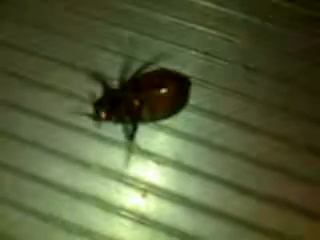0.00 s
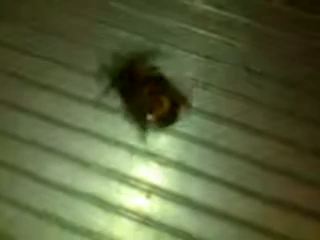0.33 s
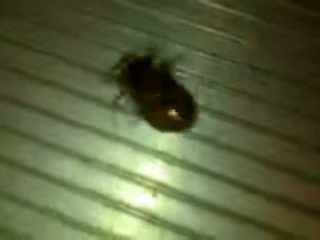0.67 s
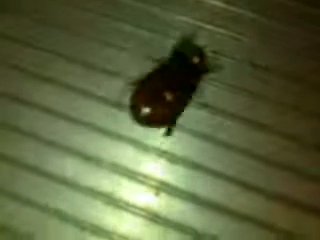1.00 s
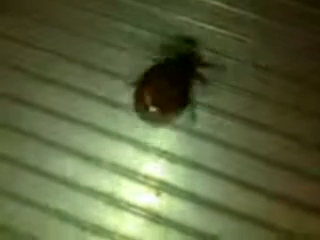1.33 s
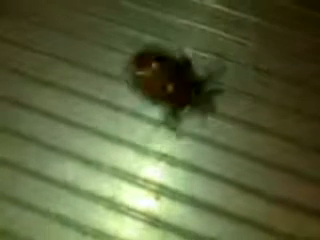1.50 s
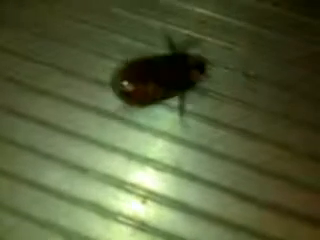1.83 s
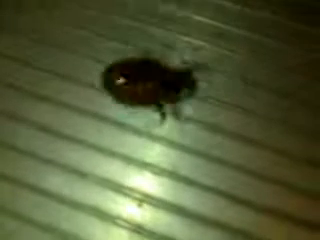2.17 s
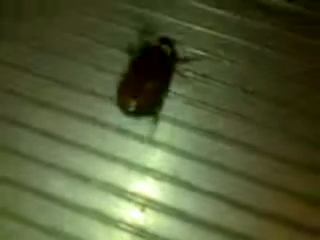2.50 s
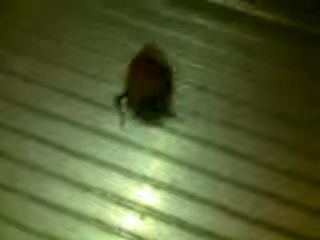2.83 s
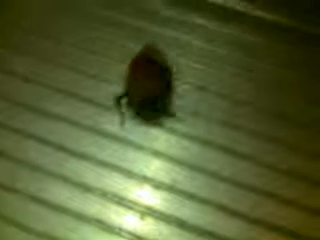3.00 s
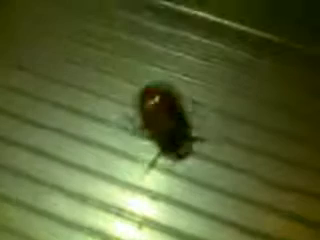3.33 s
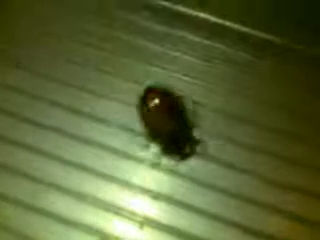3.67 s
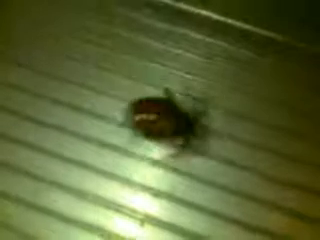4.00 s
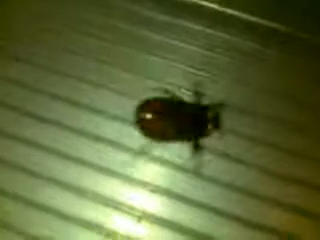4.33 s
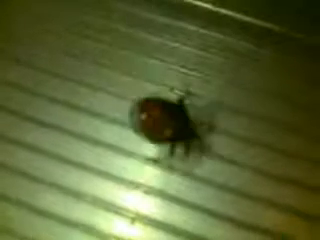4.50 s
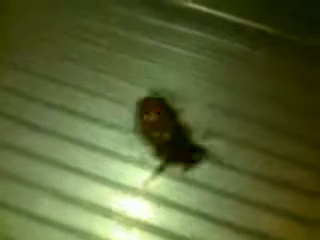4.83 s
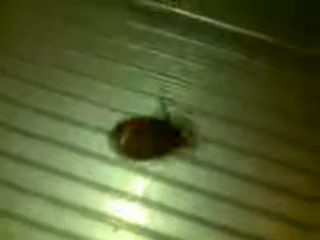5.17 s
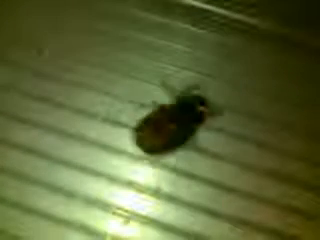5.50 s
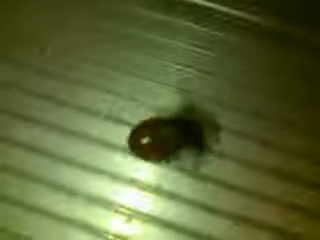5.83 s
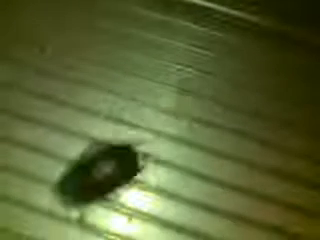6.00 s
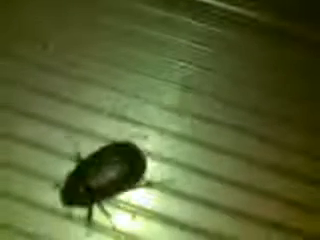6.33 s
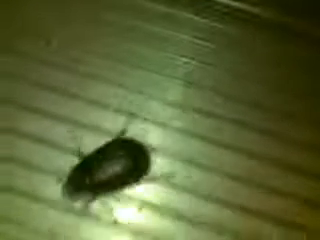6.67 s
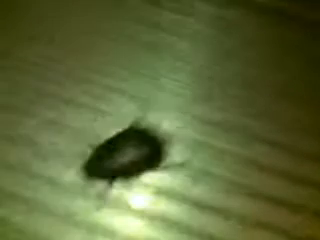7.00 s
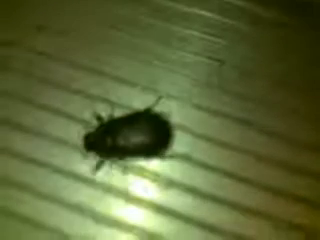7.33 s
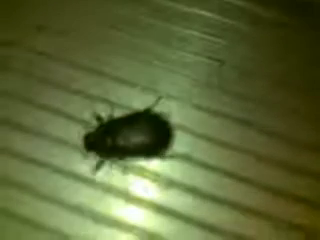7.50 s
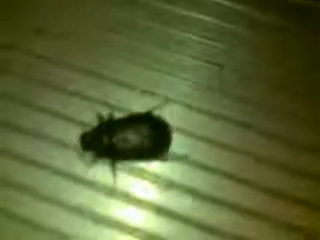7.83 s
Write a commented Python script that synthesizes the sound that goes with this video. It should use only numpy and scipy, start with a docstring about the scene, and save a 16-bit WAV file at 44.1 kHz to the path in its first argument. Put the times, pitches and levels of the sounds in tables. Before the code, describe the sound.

Faint, scattered taps of a beetle's claws and shell on a hard floor, under quiet fan hum, low rumble and hiss.

```python
"""A beetle struggles on a hard floor in a quiet room; now and then a claw or its shell ticks or skids.
Each touch makes the floor ring briefly, with a short echo from nearby surfaces.
Two slow motors, like fans elsewhere in the house, hum over a low rumble, while faint house hums beat.
Moving air and the hiss of a small microphone fill the rest."""
import sys
import numpy as np
from scipy import signal
from scipy.fft import rfft, irfft
from scipy.io import wavfile

SR = 44100
rng = np.random.default_rng(int(sys.argv[2]) if len(sys.argv) > 2 else 0)


def log_audio(samples):
    """Write samples as a 16-bit WAV file to the path given in sys.argv[1]."""
    # one column per channel
    frames = np.atleast_2d(samples).T
    # limit to full scale, then quantise
    limited = np.clip(frames, -1, 1)
    pcm = np.round(limited * 32767).astype(np.int16)
    wavfile.write(sys.argv[1], SR, pcm)


N = 349713
TIME = np.arange(N) / SR
HZ = np.maximum(np.arange(N // 2 + 1) * SR / N, 1)


def from_db(db):
    """Turn decibels into a number to multiply by."""
    return 10 ** (np.asarray(db) / 20)


def rms_one(x):
    """Scale a signal to an average power of 1."""
    return x / np.sqrt(np.mean(x ** 2) + 1e-20)


def curve(rows):
    """Join (time, value) points with straight lines."""
    return np.interp(TIME, *np.transpose(rows))


def drift(rate):
    """A random wobble of size about 1 that changes about `rate` times a second."""
    return rms_one(irfft(rfft(rng.standard_normal(N)) / (1 + (HZ / rate) ** 2) ** 2, N))


def swell(start, length, rise_s=0.1, fall_s=0.32):
    """Rise from 0 to reach 1 at `start`, hold for `length` seconds, then fall back."""
    rising = 1 + (TIME - start) / rise_s
    falling = 1 + (start + length - TIME) / fall_s
    return np.clip(np.minimum(rising, falling), 0, 1)


def noise(colour, peaks=()):
    """Noise of power 1; `colour` says which pitches are stronger, `peaks` boosts narrow bands."""
    hz, level_db = np.transpose(colour)
    colour_db = np.interp(np.log(HZ), np.log(hz), level_db)
    for centre, width, peak_db in peaks:
        colour_db += peak_db / (1 + (2 * (HZ - centre) / width) ** 2)
    edge_fade = np.minimum(HZ / hz[0], 1) * np.minimum(hz[-1] / HZ, 1) ** 2
    return rms_one(irfft(rfft(rng.standard_normal(N)) * from_db(colour_db) * edge_fade, N))


def tone(hz, level_db, waver_db, waver_rate=0.87):
    """One pure hum whose loudness wavers around `level_db`."""
    cycles = np.cumsum(hz * np.ones(N)) / SR + rng.random()
    return np.sqrt(2) * np.sin(2 * np.pi * cycles) * from_db(level_db + waver_db * drift(waver_rate))


# colour of the hiss: (frequency [Hz], relative level [dB])
HISS_COLOUR = [(500, -14.5), (2500, -6), (3300, -6), (4600, -5), (5200, -2.5), (5650, -1), (6000, -9),
               (7500, -9), (9500, -6.5), (12000, -1.5), (14200, 0)]
# faint narrow bands in it: (frequency [Hz], width [Hz], boost [dB])
HISS_PEAKS = [(3750, 80, 1.5), (5600, 200, 1.5)]
def microphone_hiss():
    """A small microphone makes a steady hiss of its own."""
    return from_db(-58) * noise(HISS_COLOUR, HISS_PEAKS)


# colours of the deep and the higher rumble: (frequency [Hz], relative level [dB])
DEEP_COLOUR = [(12, -47), (22, -0.5), (38, -2), (62, 1.5), (90, -9.5)]
HIGHER_COLOUR = [(50, -7), (75, -5.5), (105, 6), (130, -3), (215, 1.5), (255, -8.5), (290, -19.5),
                 (450, -36)]
# how the higher rumble comes and goes: (time [s], relative level [dB])
HIGHER_LEVEL = [(0.1, -50.5), (0.96, -54), (1.59, -58), (1.67, -50), (2.3, -50.5), (5.06, -51), (7.85, -54)]
def building_rumble(lull_s=1.87, lull_half_s=0.41, lull_db=11):
    """The building rumbles through the walls; the deep part falls away once, briefly."""
    dip_db = lull_db * np.exp(-((TIME - lull_s) / lull_half_s) ** 2)
    deep = from_db(-52 + 0.5 * drift(1.7) - dip_db) * noise(DEEP_COLOUR)
    higher = from_db(curve(HIGHER_LEVEL) + 1.75) * noise(HIGHER_COLOUR)
    return deep + higher


# colours of the draught, the rush and its hollow band: (frequency [Hz], relative level [dB])
DRAUGHT_COLOUR = [(220, -0.5), (290, -0.5), (350, 0.5), (420, -4.5), (520, -9), (700, -15.5)]
RUSH_COLOUR = [(400, -4), (560, -11), (720, -5.5), (800, -2.5), (930, -1.5), (1150, -5), (1500, -10),
               (2100, -16), (4000, -31)]
HOLLOW_COLOUR = [(700, -27), (860, -4), (950, 1), (1060, -11), (1250, -21)]
# how loud each one is: (time [s], relative level [dB])
DRAUGHT_LEVEL = [(0.1, -58), (0.74, -62), (2.49, -63.5), (2.71, -61), (7.85, -61)]
RUSH_LEVEL = [(0.1, -64), (1.46, -64.5), (1.76, -63), (2.99, -64.5), (6.83, -64), (7.33, -64.5),
              (7.85, -63.5)]
HOLLOW_LEVEL = [(0.4, -64), (0.8, -75), (1.55, -72), (1.75, -63.5), (2.2, -69), (2.6, -72), (6.9, -78),
                (7.6, -75)]
# pitches that the air sets singing: (frequency [Hz], width [Hz], boost [dB])
RUSH_PEAKS = [(631, 74, 10.5), (1610, 48, 0.5), (1810, 49, -1)]
def moving_air():
    """Air makes a low draught and a softer rush, with a hollow band that comes and goes."""
    draught = from_db(curve(DRAUGHT_LEVEL) + 3.0) * noise(DRAUGHT_COLOUR)
    rush = from_db(curve(RUSH_LEVEL) + 2.5) * noise(RUSH_COLOUR, RUSH_PEAKS)
    hollow = from_db(curve(HOLLOW_LEVEL)) * noise(HOLLOW_COLOUR)
    return draught + rush + hollow


# hums that stay on: (pitch [Hz], level [dB])
STEADY_HUMS = [(98.3, -54), (100.1, -56.5), (104, -57), (120, -61.5), (173, -63.5), (194.5, -65.5)]
# hums that swell and fade: (pitch [Hz], start [s], length [s], level [dB])
PASSING_HUMS = [(163.5, 0.33, 0.28, -54), (357, 3.15, .35, -66), (360, 4.0, 0.56, -67),
                (360, 6.65, .55, -68)]
# one hum that sinks, returns and dies away: (time [s], level [dB])
FADING_HUM_LEVEL = [(0.6, -55), (1.5, -64.5), (3.5, -57.5), (4.5, -71)]
def house_hums():
    """Faint hums in the house; those close in pitch beat, growing louder and softer together."""
    steady = sum(tone(hz, db, waver_db=1.5) for hz, db in STEADY_HUMS)
    passing = sum(tone(hz, db, waver_db=1.0) * swell(start, length)
                  for hz, start, length, db in PASSING_HUMS)
    fading = tone(hz=140.6, level_db=curve(FADING_HUM_LEVEL), waver_db=3.0, waver_rate=3.0)
    return steady + passing + fading


# tones of the slower fan: (multiple of the turning speed, level [dB])
SLOW_FAN_TONES = [(1, -71), (3, -53), (4, -57.5), (9, -64.5)]
def slow_fan(turns_per_s=18.08):
    """The slower fan turns at a steady speed and hums at multiples of it."""
    return sum(tone(multiple * turns_per_s, db, waver_db=0.5) for multiple, db in SLOW_FAN_TONES)


# how fast the large fan turns: (time [s], speed [turns per s])
FAN_SPEED = [(0, 21.88), (1.5, 21.78), (2.8, 21.58), (4, 21.66), (5.5, 21.74), (6.5, 21.78), (7.93, 21.82)]
# loudness of its low hum: (time [s], level [dB])
FAN_HUM_LEVEL = [(0.1, -51), (2.54, -49.5), (2.84, -44), (5.65, -45), (5.88, -42), (7.85, -42.5)]
# tones of that hum: (multiple of the turning speed, level added to the hum's [dB])
FAN_HUM_TONES = [(4, -0.37), (5, -8.5)]
# tones of its higher drone: (multiple of the turning speed, resting level [dB])
DRONE_TONES = [(10, -67), (11, -63), (12, -68), (15, -77.5)]
# when they swell: (multiple of the turning speed, start [s], length [s], level [dB])
DRONE_SWELLS = [(10, 1.86, .08, -54), (10, 3.35, .55, -56.5), (10, 4.9, 0.81, -53), (10, 6.6, 0.2, -54.5),
                (11, 0.35, 0.18, -55), (11, 1.29, 0.079, -57.5), (11, 1.73, 0.16, -53.5),
                (11, 2.75, 1.12, -54.5), (11, 5.52, 1.184, -50.5), (11, 7.24, 0.25, -52.5),
                (12, 0.85, 0.22, -59.5), (12, 4.2, 0.47, -57.5), (12, 5.62, 0.78, -55.5),
                (12, 7.2, .1, -58.5), (15, 3.33, 0.34, -64), (15, 5.85, .4, -60), (15, 7.45, 0.33, -59)]
def large_fan(flutter_depth=0.11, flutter_hz=16):
    """The blade tones all follow one shaft, so neighbours throb once a turn; the higher ones flutter."""
    speed, hum_db = curve(FAN_SPEED), curve(FAN_HUM_LEVEL)
    sound = sum(tone(multiple * speed, hum_db + db, waver_db=1.0) for multiple, db in FAN_HUM_TONES)
    for multiple, rest_db in DRONE_TONES:
        rise_db = sum((db - rest_db) * swell(start, length)
                      for which, start, length, db in DRONE_SWELLS if which == multiple)
        drone = tone(multiple * speed, rest_db + rise_db, waver_db=0.73)
        flutter = rms_one(1 + flutter_depth * drift(flutter_hz))
        sound += drone * flutter
    return sound


def ring(clicks, hz, fade_s):
    """Each click starts a tone that fades by 60 dB in `fade_s` seconds."""
    decay = from_db(-60 / (fade_s * SR))
    angle = 2 * np.pi * hz / SR
    return signal.lfilter([.5, 0, -.5], [1, -2 * decay * np.cos(angle), decay ** 2], clicks + 1e-18)


# the floor's own tones: (pitch [Hz], relative level [dB], time to fade by 60 dB [s])
FLOOR_TONES = [(620, -12.5, 0.08), (920, -23, 0.06), (1280, -20, 0.011), (1610, -11, 0.033),
               (1810, -13.5, 0.026), (2160, -15, 0.0082), (2410, -12, 0.015), (2730, -19, 0.01),
               (3350, -13, 0.016), (4020, -12, 0.004)]
def floor_ring(touches, cutoff_hz=3300):
    """Each touch (time, level, pitch) rings the floor, favouring the tones near its own pitch."""
    times, touch_db, touch_hz = np.transpose(touches)
    samples = np.round(times * SR).astype(int)
    scatter_db = rng.normal(0, 1.5, (len(times), len(FLOOR_TONES)))
    sound = np.zeros(N)
    for k, (hz, tone_db, fade_s) in enumerate(FLOOR_TONES):
        mismatch_db = np.log2(hz / touch_hz) ** 2
        clicks = np.zeros(N)
        clicks[samples] = from_db(touch_db + tone_db - mismatch_db + scatter_db[:, k])
        sound += ring(clicks, hz, fade_s)
    # a light touch hardly rings the highest tones
    return signal.sosfilt(signal.butter(2, cutoff_hz, fs=SR, output="sos"), sound)


def knocks(touches, cycles=3.1):
    """Each touch (time, level, pitch) makes a dry knock, just a few waves long."""
    sound = np.zeros(N)
    for start, db, hz in touches:
        t = TIME[:int(cycles / hz * SR)]
        first = int(start * SR)
        sound[first:first + len(t)] += from_db(db) * np.hanning(len(t)) * np.sin(2 * np.pi * hz * t)
    return sound


def echoes(sound, fade_s=0.13):
    """Nearby surfaces throw the sound back as a short blur of echoes."""
    t = TIME[:SR // 4]
    blur = rng.standard_normal(len(t)) * from_db(-60 * t / fade_s) * (t > .002)
    return signal.fftconvolve(sound, blur / np.sqrt(np.sum(blur ** 2)))[:N]


# short skids of a claw: (start [s], length [s], relative level [dB], pitch [Hz])
SKIDS = [(1.7325, .012, -46, 2400), (2.776, 0.05, -58, 3000)]
# grit and dust: (level added to the skid's [dB], typical pitch [Hz])
GRIT = [(-5, 2800), (-1, 8800)]
def claw_skids(catches_per_s=200, jitter_s=0.0005, knock_db=-9.5):
    """A claw catches on groove after groove, knocking and ringing the floor; grit crackles in between."""
    sound = np.zeros(N)
    for start, length, db, hz in SKIDS:
        count = round(length * catches_per_s) + 1
        times = start + np.arange(count) / catches_per_s + rng.normal(0, jitter_s, count)
        catches = [(time, db, hz) for time in times]
        specks = []
        for grit_db, grit_hz in GRIT:
            for time in np.tile(times, 4):  # four specks of each kind per catch
                speck_time = time + rng.uniform(-.7, .7) / catches_per_s
                speck_hz = grit_hz * 2 ** rng.uniform(-.4, .4)
                specks.append((speck_time, db + grit_db, speck_hz))
        sound += floor_ring(catches) + from_db(knock_db) * knocks(catches) + knocks(specks)
    return sound


# knocks of claw or shell: (time [s], level [dB], pitch [Hz])
# rows a few milliseconds apart merge into one tap or scrape
BEETLE_KNOCKS = [(0.1885, -52, 2110), (1.2745, -48.5, 1600), (1.2776, -54, 1650), (1.606, -49, 1600),
                 (1.7298, -42.5, 2500), (1.7343, -41.5, 1900), (1.7360, -43, 1800), (1.7393, -43.5, 1810),
                 (1.7448, -47, 1750), (2.9768, -44.5, 1550), (2.9774, -49, 2400), (2.9783, -52, 3700),
                 (4.0128, -46.5, 2000), (5.2795, -47, 1650), (5.2826, -49.5, 1900), (5.3029, -52, 3000),
                 (5.8431, -52, 2000), (6.0130, -40.5, 1580), (6.0165, -47.5, 1550), (7.0156, -54, 1600)]
def beetle(step_count=40, echo_db=-8):
    """The beetle taps and skids on the floor, while its flailing legs patter faintly at random."""
    # lowest and highest (time [s], relative level [dB], pitch [Hz]) of a step
    steps = rng.uniform([0, -59, 1400], [TIME[-1], -52, 3000], size=(step_count, 3))
    taps = knocks(BEETLE_KNOCKS) + floor_ring(BEETLE_KNOCKS)
    direct = taps + claw_skids() + floor_ring(steps)
    return direct + from_db(echo_db) * echoes(direct)


def scene():
    """The room and the beetle mix into one channel."""
    background = large_fan() + slow_fan() + house_hums() + building_rumble() + moving_air()
    return (background + beetle())[None, :]


def record(dry, cutoff_hz=14330):
    """The microphone adds its hiss, and the highest treble is cut off steeply."""
    heard = dry + microphone_hiss()
    low_pass = 1 / np.sqrt(1 + (HZ / cutoff_hz) ** 600)
    return irfft(rfft(heard) * low_pass, N)


dry = scene()
out = record(dry)
log_audio(out)
```